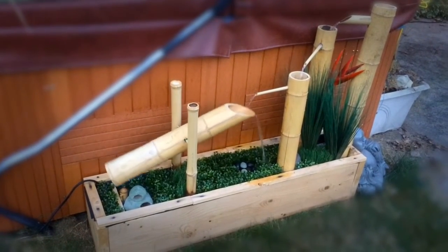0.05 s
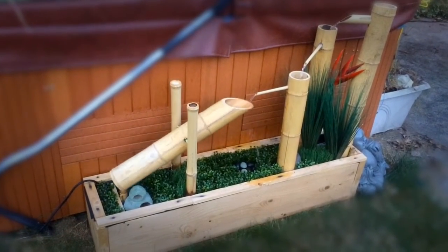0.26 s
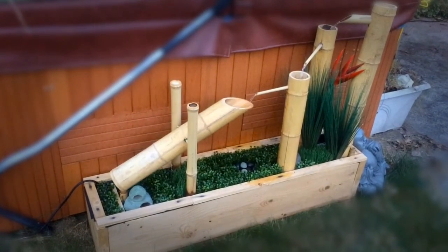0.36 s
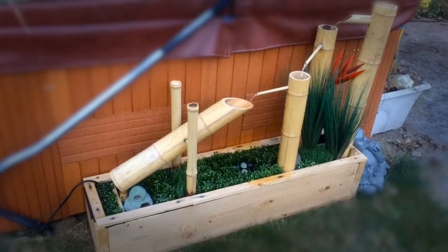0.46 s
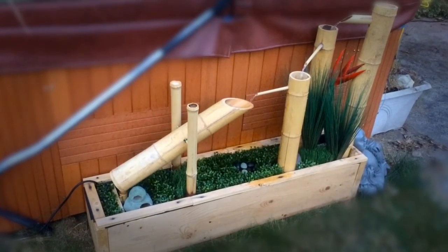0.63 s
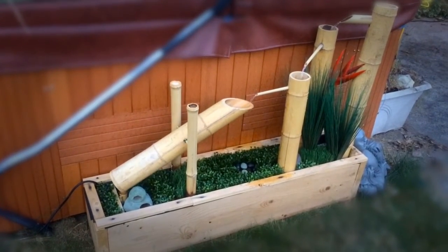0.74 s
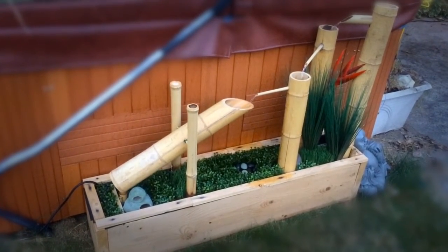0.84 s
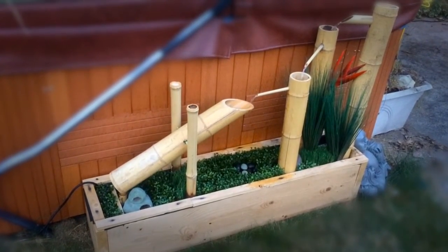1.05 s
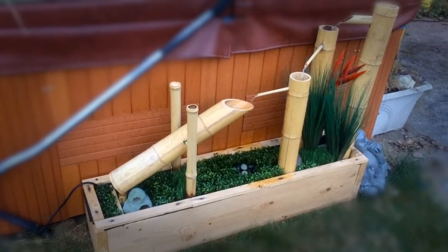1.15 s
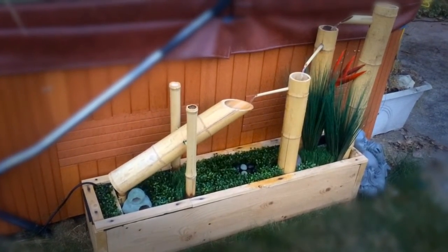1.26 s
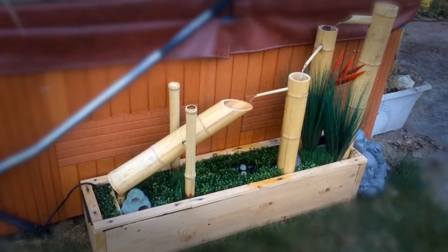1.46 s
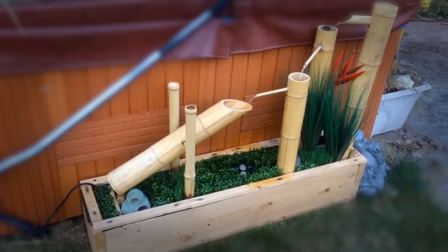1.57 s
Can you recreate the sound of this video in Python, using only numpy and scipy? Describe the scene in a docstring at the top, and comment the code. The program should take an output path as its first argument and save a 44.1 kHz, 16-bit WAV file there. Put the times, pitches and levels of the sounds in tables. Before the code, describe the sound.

A bamboo tube knocks once on a stone at about 0.2 seconds, just after a light splash of water. The knock has a dull thud, a hollow ring and a short rattle that settles by 0.4 seconds. Fine spray and small bubbles die away, while a thin trickle drips softly into the hollow tube until 1.6 seconds. A faint pump hum and quiet outdoor air lie underneath.

```python
"""First comes a light splash as the last water leaves a bamboo rocker in a garden planter.
The tube swings back and knocks once on a stone: a dull thud, a hollow ring, a short rattle.
The spilled water dies away in spray, ticks and bubbles, and a thin trickle drips into the empty
tube, making its hollow ring. A pump hums under the quiet outdoor air."""
import sys
import numpy as np
from scipy import signal
from scipy.fft import rfft, irfft
from scipy.io import wavfile
from scipy.ndimage import uniform_filter1d

SR = 44100
rng = np.random.default_rng(int(sys.argv[2]) if len(sys.argv) > 2 else 0)


def unload_wav(signal):
    """Save mono or channel-first audio to the path in sys.argv[1] as 16-bit WAV at rate SR, clipped to [-1, 1]."""
    wavfile.write(
        sys.argv[1],
        SR,
        np.round(np.clip(np.atleast_2d(signal).T, -1, 1) * 32767).astype(np.int16),
    )


N = 70560  # 1.6 seconds
CONTACT_S = .0009  # how quickly a hit on the tube builds up


def undb(db):
    """Turn decibels into a factor to multiply by."""
    return 10 ** (np.asarray(db) / 20)

def unit(x):
    """Scale to an average (rms) level of 1."""
    return x / np.sqrt(np.mean(x ** 2))

def since(start_s):
    """Seconds since a moment, zero before it."""
    return np.maximum(np.arange(N) / SR - start_s, 0)

def fade(start_s, decay_s, rise_s):
    """A quick, smooth rise, then a fall of 60 dB every decay_s."""
    t = since(start_s)
    return (1 - np.exp(-(t / rise_s) ** 2)) * np.exp(-np.log(1000) * t / decay_s)

def colour(x, spectrum):
    """Turn each pitch up or down as the spectrum says, then scale to level 1."""
    hz, db = np.array(spectrum).T
    bins_hz = np.maximum(np.arange(N // 2 + 1) * SR / N, 1)
    gain = undb(np.interp(np.log(bins_hz), np.log(hz), db))
    return unit(irfft(rfft(x) * gain, N))

def noise(spectrum):
    """A hiss or rumble with the given spectrum."""
    return colour(rng.standard_normal(N), spectrum)

def wander(per_s):
    """A smooth random drift of size about 1."""
    hold = int(SR / per_s)
    steps = np.repeat(rng.standard_normal(N // hold + 1), hold)
    return unit(uniform_filter1d(uniform_filter1d(steps, hold), hold)[:N])

def ring(start_s, tones, rise_s):
    """A struck object: its tones start together and each fades at its own speed."""
    t = since(start_s)
    return sum(undb(db) * fade(start_s, decay_s, rise_s) * np.sin(2 * np.pi * hz * t)
               for hz, db, decay_s in tones)

def patter(per_s, scatter_db):
    """Clicks at random moments; scatter_db makes their sizes uneven."""
    hits = rng.random(N) < per_s / SR
    size = np.minimum(rng.exponential(size=N), 2 * np.pi)
    return hits * rng.choice([-1, 1], N) * undb(scatter_db * size)


# Spectrum of the outdoor air: pitch_hz, level_db
AIR_SPECTRUM = [(15, -66), (25, -9), (54, 4.5), (112, 0), (163, -1), (344, -11.5), (462, -22), (600, -10.5),
                (978, -24.5), (1210, -21.5), (2400, -26), (3830, -34.5), (5880, -32.5), (13500, -73),
                (15000, -66)]

def air():
    """Quiet, steady outdoor noise, mostly a low rumble."""
    return undb(-53) * noise(AIR_SPECTRUM)

# How the pump's low hum swells and dips: time_s, level_db
HUM_LEVEL = [(0.0, -48.5), (0.244, -42), (0.458, -52), (0.618, -45.5), (0.806, -54.5), (0.89, -49),
             (1.344, -57.5), (1.39, -79), (1.426, -77), (1.496, -88), (1.564, -60), (1.6, -56)]

def pump(hum_hz=66.54, whine_hz=162.2, waver=.013):
    """The pump makes a low hum and a fainter whine, both wavering in pitch."""
    def tone(hz):
        pitch_hz = hz * (1 + waver * wander(per_s=8))
        return np.sqrt(2) * np.sin(2 * np.pi * np.cumsum(pitch_hz) / SR)
    hum = undb(.5 + np.interp(since(0), *np.array(HUM_LEVEL).T)) * tone(hum_hz)
    whine = undb(-60.5 + 1.6 * wander(per_s=7.9)) * tone(whine_hz)
    return hum + whine

# Spectrum of splashing water: pitch_hz, level_db
SPLASH_SPECTRUM = [(1500, 0), (3000, -1.5), (4400, -11.5), (5900, 2), (7000, -5.5), (8400, 2),
                   (11000, -2.5), (13600, -2.5), (16000, -23)]

def splashy(x):
    """Give noise or clicks the bright sound of a splash."""
    return colour(x, SPLASH_SPECTRUM)

# Tone colour of the finest droplets: pitch_hz, level_db
DROPLET_SPECTRUM = [(400, -10), (950, 2), (1500, 3), (2700, -4.5), (4600, -8.5), (6500, 4.5), (9000, -3.5),
                    (13000, 1), (16000, 14)]

def droplets(count=1500, low_hz=1100, high_hz=14500, cycles=28, pitch_rise=.04, scatter_db=4):
    """Fine droplets ping at random moments and pitches, each sliding slightly upward."""
    out = np.zeros(N)
    for when, pitch, size, length in rng.random((count, 4)):
        hz = (low_hz ** .5 + pitch * (high_hz ** .5 - low_hz ** .5)) ** 2
        decay_s = cycles * (.5 + length) / hz
        first = int(when * N)
        t = np.arange(min(int(decay_s * SR) + 1, N - first)) / SR
        gain = undb(scatter_db * min(-np.log(1 - size), np.pi))  # many small, a few large
        shape = (1 - np.exp(-t * hz / 2)) * np.exp(-np.log(1000) * t / decay_s)
        phase = 2 * np.pi * hz * t * (1 + pitch_rise * t / decay_s / 2)
        out[first:first + len(t)] += gain * shape * np.sin(phase)
    return colour(out, DROPLET_SPECTRUM)

# Spectrum of the mist's hiss: pitch_hz, level_db
MIST_SPECTRUM = [(300, -3.5), (950, 13.5), (1500, -19), (2700, 2), (4600, -11), (6500, -2), (9000, -5.5),
                 (13000, -6.5), (16000, -21)]
# How the spray dies down as the spilled water drains: time_s, level_db
SPRAY_LEVEL = [(0, -41.5), (.04, -51), (.17, -54), (.3, -53.5), (.45, -60), (.6, -62.5), (.9, -64.5),
               (1.6, -71.5)]

def spray():
    """Fine droplets ping, spatter and hiss, and die down after the pour."""
    pings = droplets()
    burst = fade(0, decay_s=.006, rise_s=.0001) * rng.standard_normal(N)
    spatter = splashy(signal.fftconvolve(patter(per_s=350, scatter_db=2.6), burst)[:N])
    water = pings + undb(-9.5) * spatter + undb(-1.5) * noise(MIST_SPECTRUM)
    return undb(np.interp(since(0), *np.array(SPRAY_LEVEL).T)) * water

# Air bubbles in the water: start_s, level_db, pitch_hz, decay_s
BUBBLES = [(.116, -34.5, 1746, 0.049), (.1374, -44, 2440, 0.043), (0.1433, -43, 2890, .04),
           (0.4987, -31.5, 1585, 0.045), (.597, -43, 2210, 0.028), (.6165, -51, 3540, 0.027),
           (.664, -44.5, 1500, 0.031), (.747, -42.5, 1540, 0.032), (.793, -50, 1910, 0.069),
           (1.1298, -43, 1946, 0.046), (1.5647, -43.5, 1655, 0.033)]

def bubbles(pitch_rise_per_s=.5):
    """Trapped air rings and rises a little in pitch."""
    out = 0
    for start_s, db, hz, decay_s in BUBBLES:
        t = since(start_s)
        phase = 2 * np.pi * hz * t * (1 + pitch_rise_per_s * t / 2)
        out += undb(db) * fade(start_s, decay_s, rise_s=.00093) * np.sin(phase)
    return out

# Droplets that land on wet surfaces: start_s, level_db, pitch_hz
TICKS = [(0.039, -33.5, 7100), (0.075, -32, 6320), (.137, -33.5, 9900), (.201, -31.5, 6650),
         (0.342, -37, 7750), (.429, -32, 7100), (.498, -37.5, 3730), (0.745, -37, 13460), (.807, -38, 3300),
         (0.829, -38.5, 7170), (.945, -44.5, 3530), (1.059, -41, 7930), (1.221, -39, 13850),
         (1.408, -45, 9700), (1.592, -43, 6250)]

def ticks():
    """Each droplet bursts with a tiny splash and a high ping."""
    splash = undb(-5) * splashy(rng.standard_normal(N))
    out = 0
    for start_s, db, hz in TICKS:
        ping = undb(-4) * np.sin(2 * np.pi * hz * since(start_s))
        out += undb(db) * fade(start_s, decay_s=.016, rise_s=.00092) * (splash + ping)
    return out

# Tones of the hollow inside the tube: pitch_hz, level_db, decay_s
HOLLOW_TONES = [(556.4, -11, 0.068), (655, -13, 0.089), (835, 2, 0.015), (952, -3.5, 0.026),
                (949.5, -11.5, 0.065), (1200, 0.5, 0.0047), (1488, -11, 0.03), (1937, -23, 0.052)]
# Drops that land in the tube: start_s, ring_db, splash_db
DROPS = [(.445, -38, -51), (.476, -42.5, -46), (.575, -44.5, -56), (.664, -42.5, -78), (0.702, -46, -63),
         (.723, -40, -52.5), (0.748, -45.5, -69), (0.868, -39.5, -59), (.904, -43, -71),
         (1.006, -42, -49.5), (1.097, -40.5, -55), (1.111, -40, -79), (1.142, -46.5, -66),
         (1.214, -46.5, -55.5), (1.248, -42.5, -78), (1.291, -38, -52.5), (1.347, -42, -52),
         (1.370, -44, -53), (1.44, -46.5, -52), (1.479, -47.5, -56.5), (1.536, -49, -58), (1.559, -40, -57),
         (1.584, -42, -63)]

def drops(pitch_scatter=.017, scatter_db=3, ring_boost_db=1.5, splash_boost_db=5):
    """Each drop splashes and rings the hollow a little differently, over a thin, steady trickle."""
    splash = splashy(rng.standard_normal(N))
    hollow = ring(0, HOLLOW_TONES, CONTACT_S)
    trickle = signal.fftconvolve(patter(per_s=120, scatter_db=-.5), hollow)[:N]
    out = undb(-60.5) * unit(trickle)
    for start_s, ring_db, splash_db in DROPS:
        tones = [(hz * (1 + rng.normal(0, pitch_scatter)), db + rng.normal(0, scatter_db), decay_s)
                 for hz, db, decay_s in HOLLOW_TONES]
        out += undb(ring_db + ring_boost_db) * ring(start_s, tones, rise_s=.00072)
        out += undb(splash_db + splash_boost_db) * fade(start_s, decay_s=.022, rise_s=.00047) * splash
    return out

# Small hits after the knock: start_s, level_db, decay_s
RATTLE_HITS = [(0.2597, -29, 0.032), (0.2829, -27.5, 0.029), (0.291, -32, 0.028), (0.392, -40.5, 0.06)]
# Spectrum that these hits share: pitch_hz, level_db
RATTLE_SPECTRUM = [(100, -6), (200, -2), (300, -3), (600, -9), (1000, -2), (1700, 1), (2300, -8.5),
                   (3300, -9), (4100, -15.5), (5000, -23), (14000, -30.5)]

def rattle():
    """The tube chatters on stone and axle as it settles."""
    hits = sum(undb(db) * fade(start_s, decay_s, CONTACT_S) for start_s, db, decay_s in RATTLE_HITS)
    return hits * noise(RATTLE_SPECTRUM)

# Tones of the bamboo tube: pitch_hz, level_db, decay_s
BAMBOO_TONES = [(631, -26, .15), (785, -13, .125), (936, -17, .105), (989, -24, .17), (1185, -16.5, .08),
                (1322, -8, .017), (1412, -14, .035), (1474, -27, .08), (1604, -29, .095), (1778, -28, .11),
                (1860, -27, .085), (2012, -31, .09), (2385, -29, .05), (2923, -25, .042), (3280, -32, .044)]
# Dull tones of the stone's seat in the wooden planter: pitch_hz, level_db, decay_s
PLANTER_TONES = [(131.4, -33.5, 0.23), (161.6, -29, .2), (197.6, -28.5, 0.18), (229, -24.5, .09),
                 (291.7, -19, .065), (352, -18.5, .05), (394.5, -20, 0.043)]
# Spectrum of the crack as bamboo meets stone: pitch_hz, level_db
CRACK_SPECTRUM = [(200, 15), (600, 0.5), (1300, -4), (2200, -4), (3200, -6), (3900, -0.5), (4600, -11),
                  (8000, -10), (15000, -18)]
# Spectrum of the echo from the wall and the yard: pitch_hz, level_db
ECHO_SPECTRUM = [(70, -10), (150, 4.5), (330, -4), (520, -2.5), (700, 0), (900, -1), (1600, -9),
                 (3000, -18), (5000, -33), (14000, -41)]

def knock(start_s=.2324):
    """The tube hits the stone: it rings, the planter thuds, the contact cracks and the yard echoes."""
    tube = ring(start_s, BAMBOO_TONES, CONTACT_S)
    thud = ring(start_s + .0017, PLANTER_TONES, rise_s=.00065)
    crack = undb(-19) * fade(start_s + .0021, decay_s=.02, rise_s=.0003) * noise(CRACK_SPECTRUM)
    echo = undb(-25.5) * fade(start_s, decay_s=.27, rise_s=.005) * noise(ECHO_SPECTRUM)
    return tube + thud + crack + echo


def scene():
    """Knock, water, pump and outdoor air, heard at one microphone."""
    return (knock() + rattle() + drops() + ticks() + bubbles() + spray() + pump() + air())[None]

def record(dry, low_cut_hz=46.6, high_cut_hz=15700):
    """The recorder thins the deepest bass and cuts the highest treble."""
    bass_cut = signal.butter(2, low_cut_hz, "high", fs=SR, output="sos")
    treble_cut = signal.ellip(10, .2, 80, high_cut_hz, fs=SR, output="sos")
    return signal.sosfilt(treble_cut, signal.sosfilt(bass_cut, dry))


dry = scene()
out = record(dry)
unload_wav(out)
```